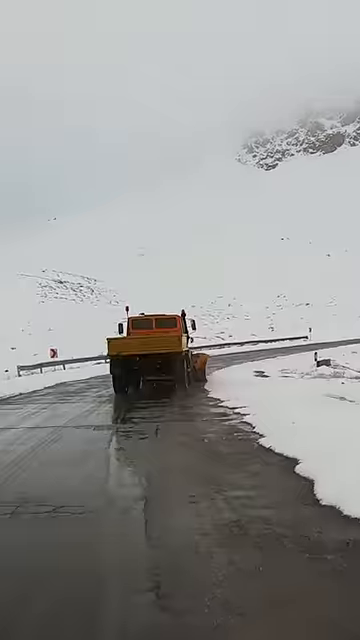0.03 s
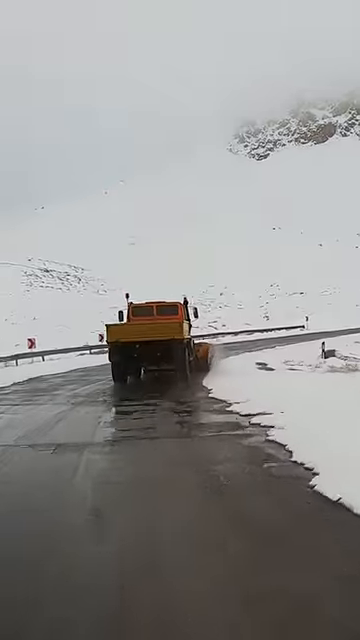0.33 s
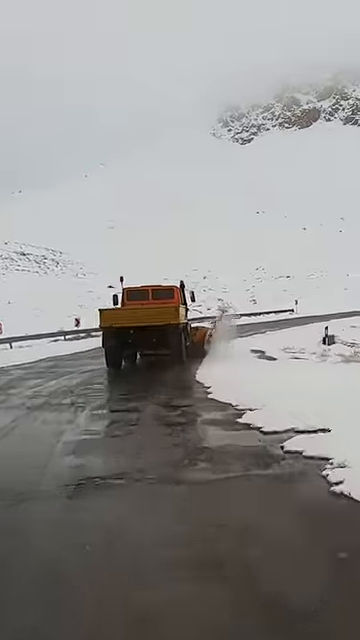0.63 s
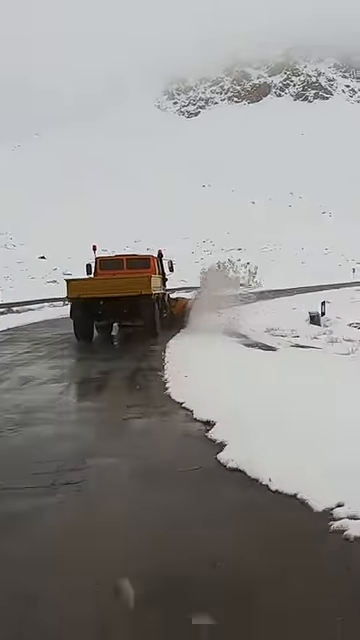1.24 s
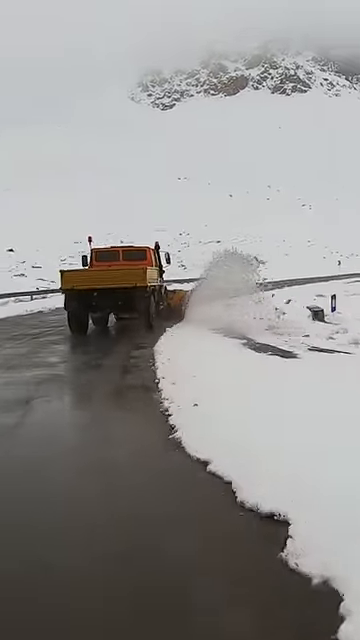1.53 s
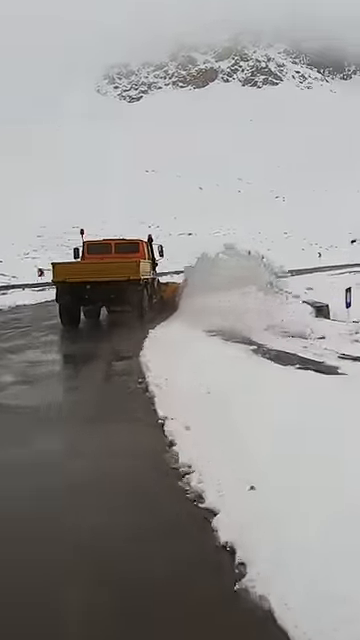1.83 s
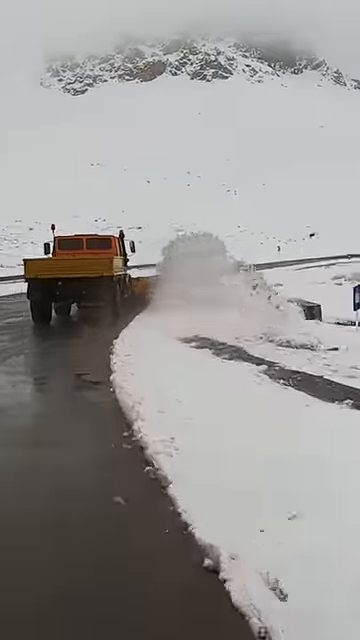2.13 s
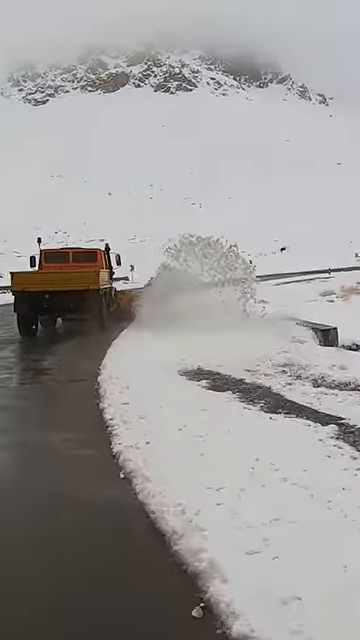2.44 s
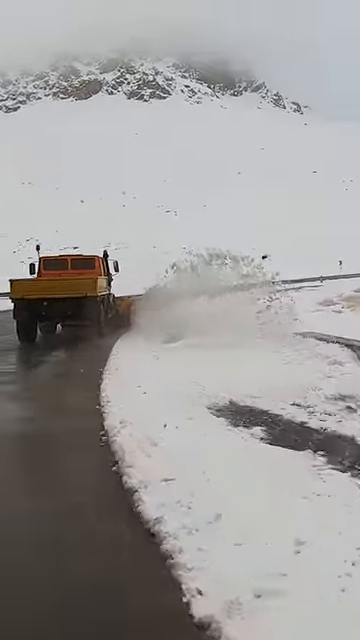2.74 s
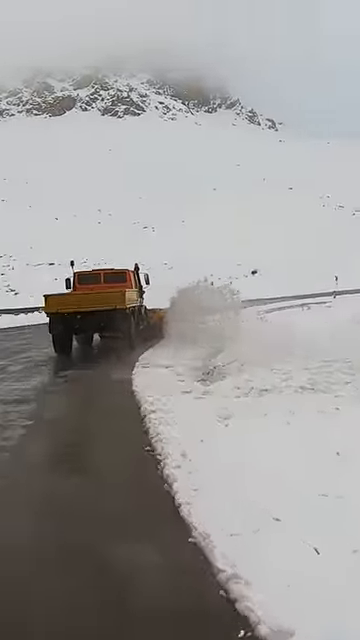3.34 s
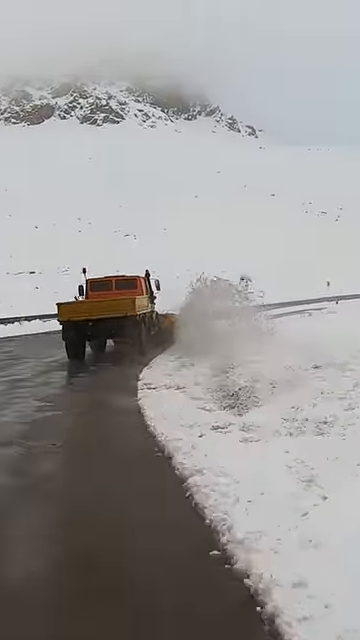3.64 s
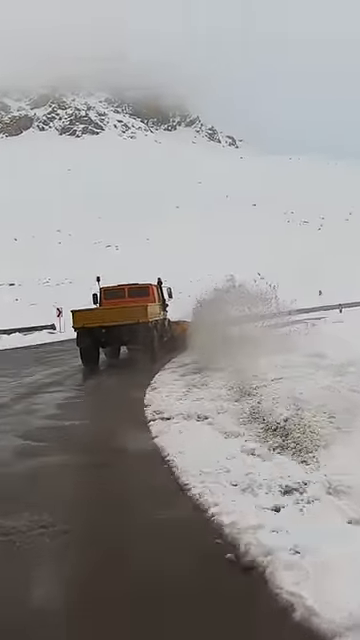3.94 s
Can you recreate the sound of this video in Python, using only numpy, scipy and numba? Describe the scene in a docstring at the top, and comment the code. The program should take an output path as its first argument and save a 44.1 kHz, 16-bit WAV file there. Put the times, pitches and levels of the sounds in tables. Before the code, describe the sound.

Heard from a vehicle behind on a mountain road, a snow plough scrapes the asphalt, its blade ringing, then squeaking and clanking over bumps. Gusty wind rumbles on the microphone throughout, over engine drone and tyre noise.

```python
"""Behind a snow plough

A wet mountain road, heard from a vehicle following the truck uphill. Wind buffets the microphone,
tyres roar and the exhaust drones. Up ahead the steel blade catches and slips on the asphalt:
it grinds, rings and squeaks, clanks over bumps and throws off hissing snow and ticks of grit."""
import sys
import numpy as np
from scipy import signal
from scipy.fft import rfft, irfft
from scipy.io import wavfile
from scipy.ndimage import uniform_filter1d
from numba import njit

SR = 44100
rng = np.random.default_rng(int(sys.argv[2]) if len(sys.argv) > 2 else 0)


def pcm_store(signal):
    """Save signal as 16-bit PCM."""
    levels = np.round(np.clip(np.atleast_2d(signal), -1, 1) * 32767)
    wavfile.write(sys.argv[1], SR, levels.astype(np.int16).T)


N = 176400

# roar of the tyres: t/s, level/dB
TYRE_LEVEL = [(0, -38.5), (.13, -38), (.27, -34.5), (.45, -34), (.62, -39), (1.1, -35.5), (1.8, -42.5),
              (2.05, -38), (2.33, -43), (2.53, -37.5), (2.9, -37.5), (3.25, -41.5), (4, -41)]
# spectrum of tyres on a wet road: f/Hz, relative level/dB
TYRE_SPECTRUM = [(60, -4), (200, 3.5), (330, -11), (440, -2), (570, -2), (700, -8), (850, -5),
                 (1100, -18.5), (2000, -17.5), (4000, -74.5), (9000, -76.5)]
# gusts at the microphone: t/s, relative level/dB
GUST_LEVEL = [(.07, -25.5), (.25, -26), (.53, -26.5), (.62, -36), (.73, -26.5), (.82, -26), (.94, -26),
              (1.01, -25), (1.1, -23), (1.18, -30), (1.37, -28), (1.46, -26), (1.57, -23.5), (1.7, -33.5),
              (1.87, -25.5), (2.12, -24), (2.25, -32.5), (2.44, -23), (2.65, -30.5), (2.77, -24),
              (2.92, -27.5), (3.0, -25), (3.1, -28.5), (3.32, -33), (3.43, -24.5), (3.59, -31.5),
              (3.69, -25), (3.85, -28), (4, -24)]
# spectrum of the wind rumble: f/Hz, relative level/dB
WIND_SPECTRUM = [(10, -7.5), (25, 1), (55, 2.5), (90, -2), (140, -6.5), (220, -12), (320, -19.5),
                 (600, -35.5), (1500, -54.5), (6000, -100)]
# eddies striking the microphone: t/s, peak level/dB, centre f/Hz
EDDIES = [(0.146, -23.5, 300), (.165, -21, 258), (.173, -17.5, 400), (.459, -25.5, 330), (0.725, -15, 90),
          (.818, -15, 290), (.827, -12, 180), (0.946, -15, 80), (1.041, -16.5, 210), (1.074, -20, 260),
          (1.3, -24, 190), (1.508, -19, 149), (1.537, -15.5, 230), (1.6, -14.5, 135), (1.632, -18.5, 220),
          (1.923, -23, 245), (2.019, -18, 140), (2.107, -19.5, 152), (2.136, -15, 160), (2.29, -24, 200),
          (2.408, -23.5, 190), (2.436, -17.5, 200), (2.565, -19.5, 200), (2.771, -20, 125),
          (2.885, -15, 125), (2.984, -17, 230), (3.006, -12.5, 120), (3.475, -14, 146), (3.741, -23.5, 199)]
# firing rate of the engine: t/s, f/Hz
FIRING_RATE = [(0, 119), (.25, 112.7), (.8, 114.5), (1.3, 116), (1.8, 119), (2.1, 118.2), (2.6, 118.3),
               (3.4, 121.6), (4, 120)]
# drone of the engine: t/s, level/dB
ENGINE_LEVEL = [(0, -36), (.8, -31), (1.3, -33.5), (1.7, -28), (2.05, -24.5), (2.25, -32), (2.45, -29),
                (2.7, -34), (2.9, -31.5), (3.3, -30), (3.46, -24), (3.65, -35.5), (4, -29.5)]
# exhaust orders: multiple of the firing rate, relative level/dB
EXHAUST_ORDERS = [(.5, -5.5), (1, 0.5), (1.5, -16.5), (2, -24.5), (3, -22.5)]
# hiss of thrown snow: t/s, relative level/dB
SNOW_LEVEL = [(.07, -59.5), (.27, -56.5), (.42, -59), (.7, -54.5), (.8, -56), (.9, -53.5), (.97, -56.5),
              (1.2, -51.5), (1.35, -56), (1.45, -51.5), (1.78, -51.5), (2.03, -53.5), (2.26, -56.5),
              (2.62, -53), (3.0, -53.5), (3.33, -51.5), (3.82, -51.5), (3.95, -49.5), (4, -51.5)]
# spectrum of thrown snow: f/Hz, relative level/dB
SNOW_SPECTRUM = [(1500, -12.5), (2600, 8), (3300, 1), (3900, 2), (4700, -6.5), (5700, -13.5), (7000, -29),
                 (9000, -40), (12000, -63), (16000, -56)]
# ticks of grit: t/s, relative peak level/dB
GRIT_TICKS = [(.299, -64), (.677, -62), (.716, -61), (1.532, -65), (2.001, -64), (2.854, -62.5)]
# squeaks of the edge: t/s, length/s, f/Hz, level/dB
EDGE_SQUEAKS = [(.655, .028, 1690, -31), (1.85, .06, 1320, -38), (1.94, .04, 1330, -35),
                (2.63, .035, 1185, -37), (2.712, .025, 1315, -30), (2.76, .035, 1230, -34),
                (2.88, .05, 1380, -36), (2.983, .02, 1385, -28), (3.09, .04, 1225, -33)]
# how hard the blade scrapes: t/s, relative level/dB
SCRAPE_FORCE = [(.07, -44.5), (.3, -42), (.5, -46), (.56, -36.5), (.62, -42.5), (.74, -34.5), (.79, -40.5),
                (.86, -38.5), (1.24, -36), (1.37, -46), (1.42, -37.5), (1.68, -37), (1.78, -33.5),
                (2.1, -34.5), (2.18, -36.5), (2.41, -40.5), (2.46, -36), (2.72, -35), (2.94, -36),
                (3.1, -35.5), (3.16, -39.5), (3.29, -35.5), (3.82, -38.5), (3.87, -34.5), (4, -32.5)]
# resonances of the steel blade: f/Hz, width/Hz, relative level/dB
BLADE_MODES = [(1226, 69, 5), (1404, 110, 2.5), (1674, 230, -1.5), (1910, 130, -2.5)]
# spectrum of the edge grinding on asphalt: f/Hz, relative level/dB
GRIND_SPECTRUM = [(300, -17.5), (600, -5.5), (950, -2.5), (1200, 2.5), (1900, -2.5), (2400, -9.5),
                  (3200, -26), (4500, -27), (7000, -102)]
# jolts of the blade over bumps: t/s, peak level/dB
BLADE_JOLTS = [(1.404, -29.5), (1.787, -25), (2.028, -28), (2.135, -32), (2.452, -34), (2.862, -27.5),
               (2.892, -31), (2.976, -23), (3.047, -22.5), (3.076, -28)]

TOP_HZ = 16900  # upper limit of the treble
TIME = np.arange(N) / SR


def undb(db):
    """Decibels to gain."""
    return 10 ** (np.asarray(db) / 20)


def unit(x):
    """Scale to rms 1."""
    return x / np.sqrt(np.mean(x ** 2))


def curve(rows):
    """Join (t/s, value) points by straight lines."""
    return np.interp(TIME, *np.array(rows).T)


def noise():
    """White noise."""
    return rng.standard_normal(N)


def walk(per_s):
    """Random levels, per_s of them a second, smoothed twice; spread near 1."""
    hold = max(int(SR / per_s), 1)
    steps = noise()[np.arange(N) // hold]
    return 1.3 * uniform_filter1d(uniform_filter1d(steps, hold), hold)


def colour(x, spectrum):
    """Filter by (f/Hz, level/dB) points; rms 1."""
    hz, db = np.array(spectrum).T
    bin_hz = np.maximum(np.fft.rfftfreq(N, 1 / SR), 1)
    gain = undb(np.interp(np.log(bin_hz), np.log(hz), db))
    return unit(irfft(rfft(x) * gain, N))


def grains(per_s, spread_db):
    """Random tiny impacts; a few stand out if the spread is positive, or fall back if negative."""
    impacts = (rng.random(N) < per_s / SR) * np.sign(noise())
    return unit(impacts * undb(spread_db * np.minimum(rng.exponential(size=N), 5)))


def bursts(rows, decay_s):
    """Envelope of (t/s, level/dB) events that start at once and die away."""
    return sum(undb(db) * (TIME >= at) * np.exp(-np.abs(TIME - at) / decay_s) for at, db in rows)


@njit
def moving_bandpass(x, hz, width_hz):
    """State-variable band-pass with a moving centre, gain 1."""
    y, band_state, low_state = np.empty(len(x)), 0., 0.
    for i in range(len(x)):
        g, damping = np.tan(np.pi * hz[i] / SR), width_hz / hz[i]
        band = (band_state + g * (x[i] - low_state)) / (1 + g * (g + damping))
        band_state = 2 * band - band_state
        low_state += 2 * g * band
        y[i] = damping * band
    return y


def tyres():
    """Tyres roll on the wet road with a slightly uneven roar."""
    flutter_db = 2.2 * walk(18)
    return colour(noise(), TYRE_SPECTRUM) * undb(curve(TYRE_LEVEL) + flutter_db)


def wind(gain_db=3):
    """Turbulence rumbles right on the microphone, gust by gust."""
    flutter_db = 2.2 * walk(45)
    return colour(noise() * undb(flutter_db), WIND_SPECTRUM) * undb(curve(GUST_LEVEL) + gain_db)


def buffets(swing_cycles=.62, turbulence_cycles=1.66, turbulence_db=-11):
    """Each eddy is one pressure swing amid turbulence; smaller eddies thump shorter and higher."""
    out = 0
    for at, db, hz in EDDIES:
        cycles = (TIME - at) * hz
        swing = np.sin(2 * np.pi * (cycles + rng.random())) * np.exp(-(cycles / swing_cycles) ** 2)
        spectrum = [(hz / 2, -10), (hz, 0), (2.83 * hz, -10), (20 * hz, -70), (TOP_HZ, -140)]
        turbulence = colour(noise(), spectrum) * np.exp(-(cycles / turbulence_cycles) ** 2)
        out += undb(db) * (swing + undb(turbulence_db) * turbulence)
    return out


def engine():
    """The truck ahead drones in the low orders of its exhaust, each wavering a little."""
    firing_hz = curve(FIRING_RATE) * (1 + .013 * walk(35))
    phase = 2 * np.pi * np.cumsum(firing_hz) / SR
    drone = sum(undb(db + 2.6 * walk(11)) * np.sin(order * phase + 2 * np.pi * rng.random())
                for order, db in EXHAUST_ORDERS)
    return unit(drone) * undb(curve(ENGINE_LEVEL))


def grit(gain_db=-7, band_hz=(5000, 10500)):
    """Grit ticks faintly and sharply among the spray."""
    band = signal.butter(3, band_hz, "band", fs=SR, output="sos")
    return unit(signal.sosfilt(band, noise())) * bursts(GRIT_TICKS, decay_s=.001) * undb(gain_db)


def spray(gain_db=2):
    """Wet snow leaves the blade in clumps of fine grains."""
    hiss = colour(grains(per_s=9000, spread_db=2.7), SNOW_SPECTRUM)
    clumps_db = 1.4 * walk(25)
    return hiss * undb(curve(SNOW_LEVEL) + gain_db + clumps_db)


def squeaks(waver=.028, upper_ratio=1.36, upper_db=-12.5):
    """For a moment the slipping edge locks onto a wavering pair of the steel's modes."""
    out = 0
    for at, length, hz, db in EDGE_SQUEAKS:
        phase = 2 * np.pi * np.cumsum(hz * (1 + waver * walk(250))) / SR
        note = np.sin(phase) + undb(upper_db) * np.sin(upper_ratio * phase)
        swell = np.exp(-(2 * (TIME - at) / length) ** 2)
        out += unit(note) * undb(db) * swell
    return out


def steel(drive, bend=.035, flicker_db=1, shifts_per_s=30):
    """The blade's resonances shift and trade strength as the contact moves; rms 1."""
    out = 0
    for k, (hz, width_hz, db) in enumerate(BLADE_MODES):
        strength = undb(db + flicker_db * walk(shifts_per_s))
        centre_hz = hz * np.exp(bend * walk(shifts_per_s))
        out += (-1) ** k * moving_bandpass(drive * strength, centre_hz, float(width_hz))
    span_hz = [.87 * BLADE_MODES[0][0], 1.22 * BLADE_MODES[-1][0]]  # steep fall outside the modes
    return unit(signal.sosfilt(signal.butter(2, span_hz, "band", fs=SR, output="sos"), out))


def blade(usual_force_db=-35, ring_db=-38, grind_db=-35, ring_growth=1.58):
    """The edge catches and slips on asphalt; harder scraping rings the steel more. Bumps clank it."""
    force_db = curve(SCRAPE_FORCE) - usual_force_db
    chatter = undb(1.5 * walk(per_s=91.1))
    catches = grains(per_s=2200, spread_db=-.5) * chatter
    ringing = steel(catches) * undb(ring_db + ring_growth * force_db)
    scratches = grains(per_s=2500, spread_db=2) * chatter
    grinding = colour(scratches, GRIND_SPECTRUM) * undb(grind_db + force_db)
    jolts = bursts(BLADE_JOLTS, decay_s=.0071)
    clanks = steel(noise() * jolts) * np.sqrt(np.mean(jolts ** 2))
    return ringing + grinding + clanks


def scene():
    """The plough ahead, the road and the wind, at one microphone on the following vehicle."""
    return (engine() + blade() + squeaks() + spray() + grit() + tyres() + wind() + buffets())[None]


def record(dry):
    """The sound begins after a brief silence, with a quick fade-in; the highest treble is cut."""
    silence_s, fade_s = .056, .004
    fade_in = np.clip((TIME - silence_s) / fade_s, 0, 1)
    lowpass = signal.ellip(8, .2, 70, TOP_HZ, fs=SR, output="sos")
    return signal.sosfilt(lowpass, dry * fade_in)


dry = scene()
out = record(dry)
pcm_store(out)
```